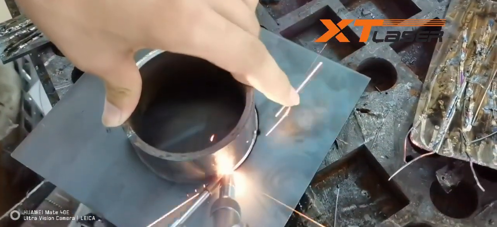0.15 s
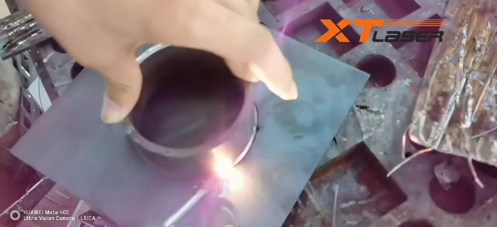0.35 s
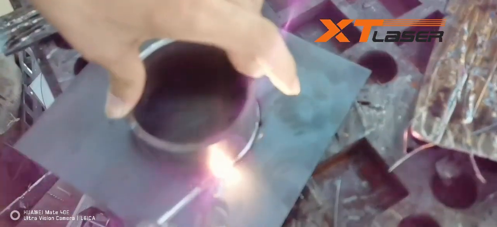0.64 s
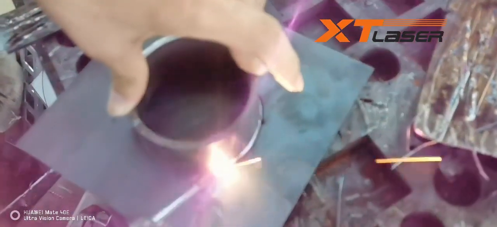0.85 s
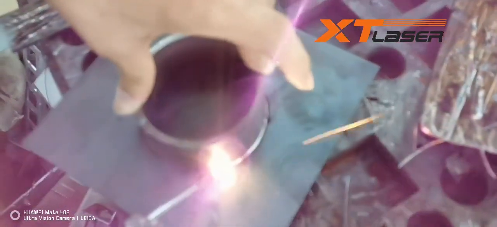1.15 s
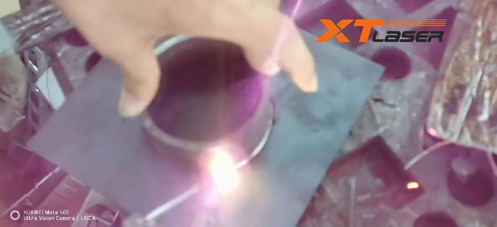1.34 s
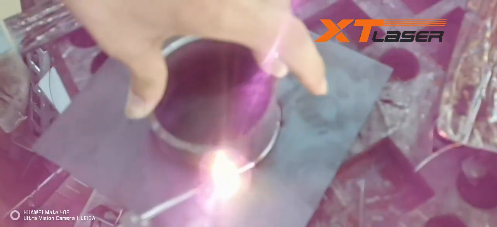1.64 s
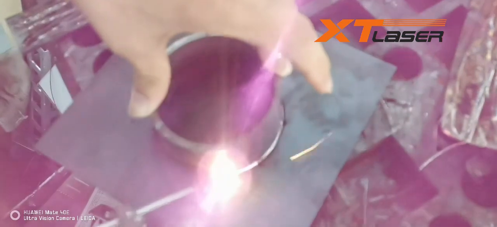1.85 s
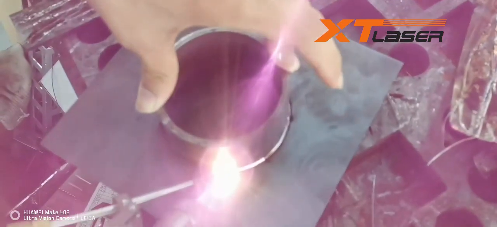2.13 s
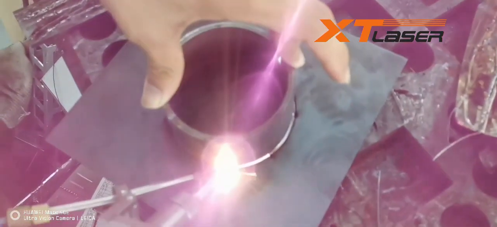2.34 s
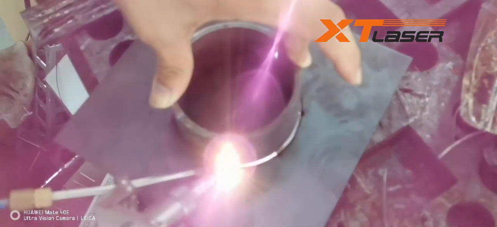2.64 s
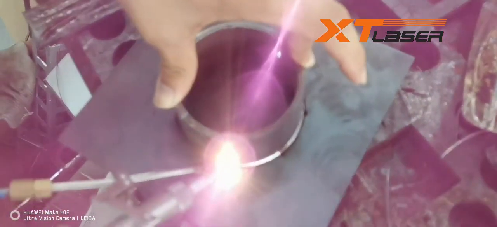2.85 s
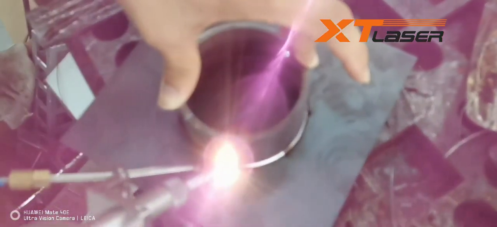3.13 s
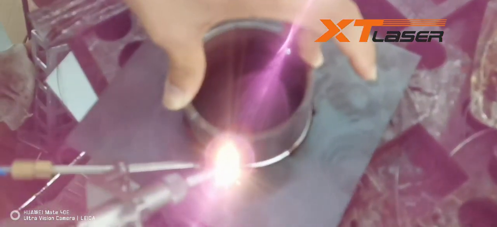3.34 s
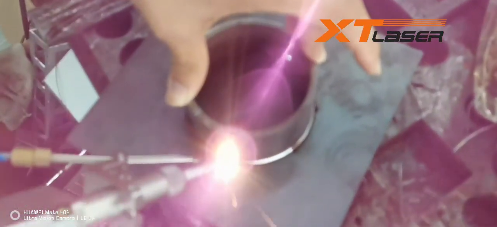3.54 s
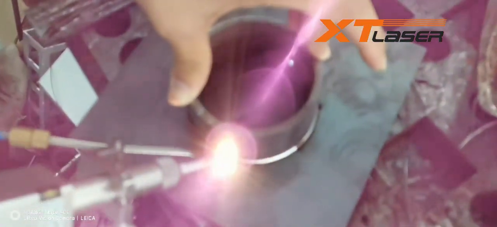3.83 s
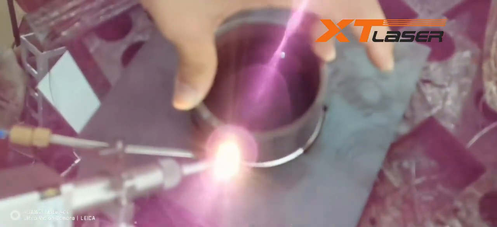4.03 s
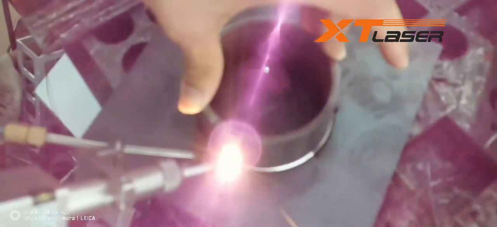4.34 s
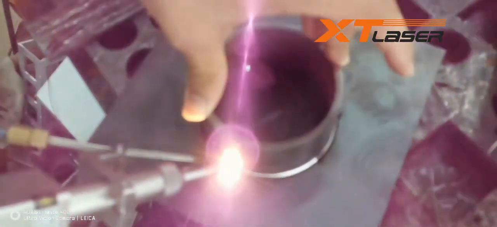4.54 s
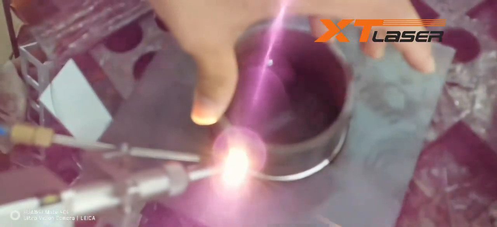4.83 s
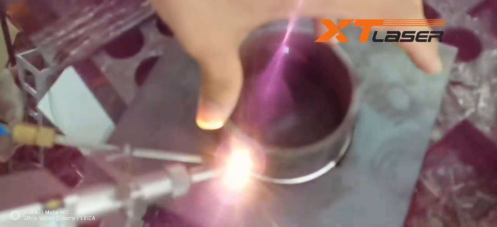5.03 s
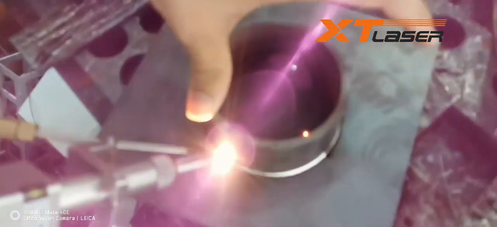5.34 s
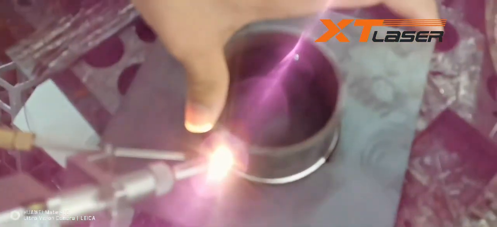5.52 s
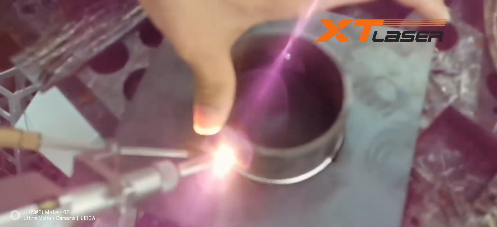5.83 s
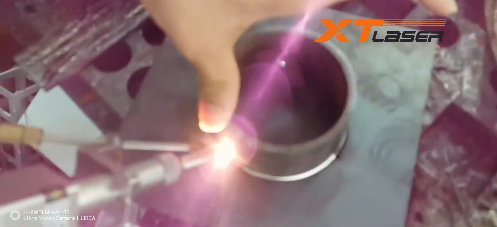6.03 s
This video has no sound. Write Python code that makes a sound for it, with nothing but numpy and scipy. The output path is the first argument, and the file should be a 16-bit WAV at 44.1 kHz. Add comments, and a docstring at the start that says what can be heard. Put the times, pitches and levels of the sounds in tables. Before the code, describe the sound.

A welding beam is already biting into steel at the start: a loud, bright, smooth hiss for about a quarter second, then a brief falter and a slightly quieter, rougher hiss with a rapid buzzing pulse. Tiny crackles and sharp droplet spits dot it. Its tone slides slowly as the torch moves. Faint hum and low fan air lie beneath. Close stereo microphone, almost no echo.

```python
"""Handheld laser welding on steel, close up

A bright flare on cold steel hands over to a settled vapour hiss, pulsed by the beam's side-to-side sweep.
Jet and spits are shaped noise; resonances of pipe stub and plate, and gliding echoes off the hand, colour them.
The sweeping head hums in wavering sines; the workshop's air is a low noise with passing rumbles.
"""
import sys
import numpy as np
from scipy import signal
from scipy.fft import rfft, irfft, next_fast_len
from scipy.io import wavfile
from scipy.ndimage import uniform_filter1d, map_coordinates

SR = 44100
rng = np.random.default_rng(int(sys.argv[2]) if len(sys.argv) > 2 else 0)


def to_wav(s):
    """Save 16-bit WAV."""
    ch = np.atleast_2d(s).T  # columns
    pcm = np.round(np.clip(ch, -1, 1) * 32767)  # PCM
    wavfile.write(sys.argv[1], SR, pcm.astype(np.int16))


N = 272402
TIME = np.arange(N) / SR
SWEEP_HZ = 79.96  # side-to-side rate of the beam
RING_OUT_S = 5.13  # the plate rings out around this moment


def amp(db):
    """Turn decibels into gain."""
    return 10 ** (np.asarray(db) / 20)


def unit(x):
    """Scale to rms 1."""
    return x / np.sqrt(np.mean(x ** 2) + 1e-20)


def along(points, hz):
    """Read each column of (Hz, ..) rows at hz, on a log frequency axis."""
    point_hz, *columns = np.transpose(points)
    return [np.interp(np.log(hz + 1), np.log(point_hz + 1), column) for column in columns]


def wobble(rate):
    """Draw a smooth random curve with this many knots a second."""
    knots = rng.standard_normal(int(N * rate / SR) + 4)
    return map_coordinates(knots, [TIME * rate])


def swell(peak_s, width_s, t=TIME):
    """Draw a bell that rises to 1 and falls again."""
    return np.exp(-((t - peak_s) / width_s) ** 2)


def seam(*levels_db):
    """Draw a smooth arc through the levels at the start, middle and end of the seam."""
    return np.polyval(np.polyfit([0, .5, 1], levels_db, 2), TIME / TIME[-1])


def filtered(x, response):
    """Multiply the spectrum of x by a response of frequency, which may be complex."""
    size = next_fast_len(N + SR // 4)
    hz = np.fft.rfftfreq(size, 1 / SR)
    return irfft(rfft(x, size) * response(hz), size)[..., :N]


def below(hz, edge_hz, order=24):
    """Gain of a low-pass; a higher order is steeper."""
    return 1 / (1 + (hz / edge_hz) ** order)


def workshop_air(level_db):
    """Low rush of fans: noise partly alike at the two ports, with a rumble that swells now and then."""
    # Spectrum of the air. Each row: frequency in Hz, relative level in dB.
    air_spectrum = [(12, -64), (20, -37), (88, -9.5), (130, -7), (157, -6), (243, -6.5), (270, -13),
                    (310, -8), (345, -11), (480, -9.5), (756, -12.5), (1300, -13), (1690, -80),
                    (2860, -120)]
    # Likeness of the air at the two ports. Each row: frequency in Hz, likeness from 0 to 1.
    air_alike = [(30, 0.3), (80, 0.7), (200, 0.8), (600, 0.85), (1200, 0.52)]
    # Rumbles. Each row: peak in seconds, half length in seconds, centre in Hz, width in Hz, level in dB.
    rumble_swells = [(0.88, .13, 95, 40, -58), (2.38, .12, 139, 90, -55), (2.9, 0.56, 165, 110, -54.5),
                     (3.0, 0.34, 240, 35, -57.5), (3.057, 0.052, 162, 40, -49), (3.75, 0.054, 155, 50, -50)]

    def colour(hz):
        # the angle splits the power between sum and difference, which sets the likeness
        angle = np.arccos(np.clip(along(air_alike, hz)[0], 0, 1)) / 2
        return amp(along(air_spectrum, hz)[0]) * np.array([np.cos(angle), np.sin(angle)])

    mid, side = filtered(rng.standard_normal((2, N)), colour)
    air = amp(level_db + 0.37 * wobble(7.7)) * unit(np.array([mid + side, mid - side]))
    for peak_s, length_s, centre_hz, width_hz, db in rumble_swells:
        noise = rng.standard_normal(N) + .55 * rng.standard_normal((2, N))
        rumble = filtered(noise, lambda hz: below(2 * (hz - centre_hz), width_hz, order=4))
        air += amp(db) * swell(peak_s, length_s) * unit(rumble)
    return air * amp([[.4], [-.4]])  # the left port is slightly louder


def hum(gain_db, waver_db, drift_cycles, whine_db, whine_s):
    """The sweeping head hums near multiples of its rate; the high lines whine as the plate rings out."""
    # Lines of the hum. Each row: multiple of the sweep rate, relative level in dB rms.
    lines = [(1, -72), (2, -57.5), (3, -67.5), (4, -66.5), (5, -71), (6, -66), (7, -70), (8, -74),
             (13, -73), (15, -80), (16, -83)]
    fade_starts_s, fade_db_per_s = 5.1, 4  # the hum eases towards the end of the seam
    fade_db = -fade_db_per_s * np.maximum(TIME - fade_starts_s, 0)
    whine = whine_db * swell(RING_OUT_S, whine_s)
    out = np.zeros(N)
    for multiple, db in lines:
        hz = round(multiple) * SWEEP_HZ
        level_db = db + waver_db * wobble(11) + (hz > 950) * whine + fade_db
        cycles = hz * TIME + rng.random() + drift_cycles * wobble(7)
        out += amp(level_db) * np.sin(2 * np.pi * cycles)
    return amp(gain_db) * np.sqrt(2) * out


def room(x, t60):
    """A faint, very short scatter off the bench and the metal around it: decaying noise as an echo tail."""
    t = np.arange(SR // 2) / SR
    tail = rng.standard_normal((2, len(t))) * amp(-60 * t / t60) * (t > .004)
    return signal.fftconvolve(x, tail / np.linalg.norm(tail[0]), axes=1)[:, :N]


def off_hand(x):
    """Hand and pipe return the short waves later as the torch moves on, so combs glide down the treble."""
    # Echoes. Each row: first delay in ms, eventual growth in ms, gain at the left port, gain at the right.
    echoes = [(.69, .39, .22, 0), (.74, .67, 0, -.22), (.84, .34, .22, .18), (2.0, .27, -.06, -.14)]
    settles_s = 2.3
    treble = filtered(x, lambda hz: 1 - below(hz, 6500, order=6))
    moved = 1 - np.exp(-TIME / settles_s)
    out = x.copy()
    for first_ms, growth_ms, *gains in echoes:
        read_at = (TIME - (first_ms + growth_ms * moved) / 1000) * SR
        out += np.array([gain * map_coordinates(port, [read_at], order=5)
                         for gain, port in zip(gains, treble)])
    return out


def shaded(x, blotch_db, dips_and_swells=()):
    """Colour the ports' sum and difference: slow random blotches, dips and swells whose centre slowly falls."""
    sag_per_s = 0.027  # share of its frequency by which a centre falls each second
    both = np.array([x[0] + x[1], x[0] - x[1]]) / 2
    hz, s, z = signal.stft(both, SR, nperseg=1024)
    field = rng.standard_normal(z.shape)
    for _ in range(2):
        field = uniform_filter1d(field, size=5, axis=1)  # across frequency
        field = uniform_filter1d(field, size=16, axis=2)  # across time
    gain_db = blotch_db * unit(field)
    for peak_s, length_s, centre_hz, width_hz, *changes_db in dips_and_swells:
        falling_hz = centre_hz * (1 - sag_per_s * (s - peak_s))
        offset = (hz[:, None] - falling_hz) / width_hz
        shape = swell(peak_s, length_s, s) * .5 ** (2 * offset) ** 2
        gain_db += np.multiply.outer(changes_db, shape)
    mid, side = signal.istft(z * amp(gain_db), SR, nperseg=1024)[1][..., :N]
    return np.array([mid + side, mid - side])


def vapour(pulse_db, burst_db, flutter_db, crackle):
    """Three noises (direct, scattered left, scattered right): boiling steel pulses together over steady gas."""
    sweep = 2 * np.pi * SWEEP_HZ * TIME
    # the beam crosses the joint twice a sweep, and one crossing starts with a sharp burst
    crossings = pulse_db * np.cos(2 * (sweep - 1.9))
    burst = burst_db * np.exp(7 * (np.cos(sweep - 1.4) - 1))
    # the vapour stalls as the beam turns back
    stall = 1.2 * np.exp(9 * (np.cos(sweep - 3.5) - 1))
    # the pulsing grows deeper and shallower with the melt
    pulses = (crossings + burst - stall) * (1.05 + .3 * wobble(12))
    # the melt pool flutters quickly
    surge = amp(pulses + flutter_db * wobble(700))
    # tiny pops, about 500 a second, stand out of the direct rush
    pops = unit((rng.random(N) < 500 / SR) * rng.standard_normal(N))
    rush = rng.standard_normal((3, N))
    rush[0] += crackle * pops
    boiling = unit(surge * rush)
    gas = rng.standard_normal((3, N))

    def gas_share(hz):
        # steady gas fills the lower hiss and part of the airy top; pulsing vapour owns the treble between
        return below(hz, 6600, order=4) + .25 * (1 - below(hz, 12000, order=12))

    pulsing = filtered(boiling, lambda hz: np.sqrt(1 - gas_share(hz)))
    steady = filtered(gas, lambda hz: np.sqrt(gas_share(hz)))
    return pulsing + steady


def spits(gain_db, t60):
    """Droplets burst from the melt, each a very short crack of decaying noise."""
    # The loudest spits of molten steel. Each row: start in seconds, relative peak level in dB.
    droplets = [(0.161, -17), (0.212, -18), (0.378, -16), (1.078, -17), (2.454, -16), (2.491, -18),
                (3.0665, -14.5), (3.3046, -18), (3.4547, -16), (3.554, -16), (4.8287, -19), (5.168, -16)]
    envelope = np.zeros(N)
    t = np.arange(SR // 40) / SR
    for start_s, db in droplets:
        start = round(start_s * SR)
        envelope[start:start + len(t)] += amp(db + gain_db - 60 * t / t60)
    return envelope * rng.standard_normal((3, N))


def at_ports(x, colour_db):
    """Colour the jet; its direct part reaches the left port first, its scattered part differs between ports."""
    # The two microphone ports. Each row: frequency in Hz, left minus right in dB, likeness from 0 to 1,
    # phase lead of the left in radians.
    ports = [(700, 0.7, 0.77, 0.2), (1100, 1.2, 0.66, 1.2), (1350, 0.3, 0.55, 0.8), (1620, 2, 0.7, 2.6),
             (1830, 0, 0.66, 0.8), (2300, 0.3, 0.62, 2), (2950, 0.4, 0.87, 6.2), (3700, -1, 0.75, 7.1),
             (3950, -0.7, 0.78, 8.7), (4500, -1.2, 0.8, 8.6), (5400, 0.4, 0.8, 10.1),
             (5750, 2.5, 0.65, 9.7), (6400, 0.3, 0.62, 10.3), (6850, 0, 0.88, 12.4), (7800, 0.5, 0.7, 14.1),
             (8500, 5, 0.35, 13.6), (9200, 10, 0.5, 15.6), (10300, 9, 0.64, 17.1), (11100, 3, 0.62, 17.9),
             (12200, 0.7, 0.78, 18.6), (12550, 1, 0.7, 18.9), (12900, 1, 0.5, 20.7), (13300, 0, 0.55, 19.4),
             (14200, -3, 0.68, 20.6), (15600, -1.5, 0.4, 22.3)]

    def port_gain(hz, direct):
        balance_db, alike, lead = along(ports, hz)
        alike = np.clip(alike, 0, 1)
        sides = amp([balance_db / 2, -balance_db / 2])
        sides = sides / np.linalg.norm(sides, axis=0)
        gain = amp(colour_db(hz)) * sides * (1 - below(hz, 720, order=4))
        if direct:
            return gain * np.sqrt(alike) * np.exp(.5j * np.array([lead, -lead]))
        return gain * np.sqrt(1 - alike)

    direct = filtered(x[0], lambda hz: port_gain(hz, True))
    scattered = filtered(x[1:], lambda hz: port_gain(hz, False))
    return direct + scattered


def flare():
    """The beam bites into cold steel with a louder, brighter, smoother hiss that holds and then sags."""
    # Spectrum of the flare. Each row: frequency in Hz, relative level in dB.
    flare_spectrum = [(500, -34), (1250, -27.5), (1550, -24), (1800, -11), (2050, -14), (2650, -9),
                      (3100, -5.5), (3700, -7.5), (4400, -5), (5000, -5.5), (5600, -2), (6050, -3),
                      (6500, -6), (7200, -2), (8200, -8), (8900, 0), (10500, 2.5), (10900, -1.5),
                      (11800, 0), (12400, -7), (12800, -4.5), (13400, -5), (14000, -3), (14700, -10),
                      (15600, -6)]
    start_db, hold_s, sag_db_per_s = -14, 0.18, 30
    level_db = start_db - sag_db_per_s * np.maximum(TIME - hold_s, 0)
    jet = vapour(pulse_db=1.1, burst_db=.8, flutter_db=.9, crackle=.07) + spits(gain_db=23, t60=.009)
    return amp(level_db) * unit(at_ports(jet, lambda hz: along(flare_spectrum, hz)[0]))


def plate_ring():
    """Level of the plate's ring in dB: it grows along the seam and rings out once."""
    return seam(-39, -33, -31) + 4 * swell(RING_OUT_S, width_s=0.54)


def weld():
    """The settled jet rings the steel; bands of its hiss change level as the torch moves round the pipe."""
    # Spectrum of the settled jet. Each row: frequency in Hz, relative level in dB.
    jet_spectrum = [(700, -30), (1400, -23.5), (1650, -24.5), (2600, -17.5), (3300, -7.5), (3800, -7),
                    (5400, -3.5), (6350, -9), (7600, -8.5), (8350, -11.5), (9100, -7), (12700, -8),
                    (13400, -10), (15600, -8.5)]
    # Resonances of the pipe stub and plate. Each row: centre in Hz, width in Hz, boost in dB.
    steel = [(1047, 41, 11.5), (1227, 170, 7), (1834, 234, 15), (3059, 190, 7.5), (4330, 73, 8),
             (5707, 560, 6), (6730, 150, 4), (7670, 500, 4), (9260, 400, 2), (10320, 1100, 4),
             (11940, 700, 3), (12740, 260, 1.5), (13800, 400, 5.5)]
    # The highest hiss beams sideways as the torch turns. Each row: time in seconds, left minus right in dB.
    top_pan = [(0.4, 2.5), (2.08, -1), (3.48, 2), (5.96, 4.5), (6.1, 2)]

    # the jet is nearly steady, but falters once just after the flare
    level_db = -24 + 0.36 * wobble(5.06) - 3 * swell(0.456, width_s=0.041)
    jet = vapour(pulse_db=1.7, burst_db=3.7, flutter_db=1.3, crackle=.2) + spits(gain_db=22.0, t60=0.009)

    def colour_db(hz):
        rings = sum(db / (1 + (2 * (hz - centre_hz) / width_hz) ** 2) for centre_hz, width_hz, db in steel)
        return along(jet_spectrum, hz)[0] + rings

    hiss = at_ports(jet, colour_db)

    def part(low_hz, high_hz):
        return filtered(hiss, lambda hz: below(hz, high_hz) - below(hz, low_hz))

    def flicker(depth_db):
        # slow and quick wavering of one part on its own
        return depth_db * (wobble(9) + wobble(70))

    # each seam() arc is a part's level in dB at the start, halfway and at the end
    plate = amp(plate_ring()) * unit(part(470, 1540))
    pipe = amp(seam(-19, -18, -19.5) + flicker(depth_db=1.03)) * unit(part(1503, 2040))
    # the valley just above the pipe's note is deepest near halfway along the seam
    valley = amp(seam(-14, -20.5, -16.5)) * unit(part(2060, 2820))
    body = amp(seam(-7, -4.5, -5) + flicker(depth_db=0.5)) * unit(part(2724, 5085) + part(5986, 8160))
    sizzle = amp(seam(-10.5, -12, -5) + flicker(depth_db=2.1)) * unit(part(5040, 5870))
    top_pan_db = np.interp(TIME, *np.transpose(top_pan))
    sides = unit(amp(np.array([top_pan_db, -top_pan_db]) / 2))
    top = amp(seam(-1, -0.16, -2.5)) * sides * np.array([unit(port) for port in part(8270, SR / 2)])
    return amp(level_db) * (plate + pipe + valley + body + sizzle + top)


def scene():
    """The flare hands over to the settled weld, whose melt pool heaves irregularly at roughly 4 to 12 Hz."""
    # Dips and swells of the hiss, in the ports' sum and difference. Each row: strongest at in seconds,
    # half length in seconds, centre in Hz, width in Hz, change of the sum in dB, of the difference in dB.
    dips_and_swells = [(0.1, 0.23, 4030, 220, -22, -8), (0.59, 0.29, 3990, 280.8, -36, -9),
                       (0.8, 0.75, 5260, 555.6, -2, -13), (2.4, 0.4, 5870, 281, -30, -8),
                       (2.1, 0.82, 5200, 240, -6, -19), (3.07, 1.27, 2742, 176, -25, -11),
                       (3.5, 0.45, 13450, 400, -8, -11), (3.9, 0.95, 8160, 540, -8.5, -3),
                       (4, 0.21, 4870, 430, -8, -7), (4.93, 0.86, 11500, 468, -7, -3),
                       (5.72, 0.44, 4030, 360, -26, -3), (6, 0.57, 8380, 500, -15, -4),
                       (6.32, 0.35, 6150, 720, 13, 6), (1.96, 1, 7660, 970, 2.5, 1.5),
                       (0.5, 1.1, 3300, 250, -1, -8), (0.5, 1.1, 2660, 302, 0.5, -12),
                       (0.8, 1.1, 4770, 378, 4, 4), (1.05, 0.53, 4410, 300, 5, 1),
                       (0.3, 1.2, 1560, 250, -4, 5), (0.9, 0.74, 1880, 180, -6.5, -6),
                       (4.1, 1, 3350, 486, -1.5, 5), (5.7, 0.9, 9400, 400, 0, -11),
                       (5.5, 0.38, 13100, 400, -5, 4), (4.1, 0.6, 12100, 300, 6, 1),
                       (6.1, 0.3, 4500, 378, 0, -4), (0.9, 0.52, 11200, 260, -9, -5),
                       (1.5, 0.4, 9900, 260, -1, -7), (2.35, 0.39, 9900, 220, -7, -3),
                       (2.6, 0.55, 11400, 450, 2.5, 0), (3.2, 0.7, 1830, 300, 0.5, -2),
                       (3.9, 0.6, 3300, 900, 1.8, 0), (4.15, 0.4, 5600, 600, 2.5, 0),
                       (0.1, 0.2, 4450, 400, 3, 0), (4.9, 0.55, 1009, 120.4, 2, 5),
                       (5, 0.18, 1200, 183.6, 9, 6)]
    settle_s, handover_s = 0.277, 0.046
    settled = np.clip((TIME - settle_s) / handover_s, 0, 1)
    heave = unit(filtered(rng.standard_normal(N), lambda hz: below(hz, 12, order=4) - below(hz, 4, order=6)))
    torch = np.sqrt(1 - settled) * flare() + np.sqrt(settled) * amp(.45 * heave) * weld()
    torch = shaded(off_hand(torch), blotch_db=1.0, dips_and_swells=dips_and_swells)
    air = shaded(workshop_air(level_db=-51.0), blotch_db=1.2)
    machine = hum(gain_db=-1.5, waver_db=2, drift_cycles=0.11, whine_db=16, whine_s=0.6)
    return torch + amp(-9) * room(torch, t60=0.021) + machine + air


def record(dry):
    """Softly limit the highest peaks and cut everything above the top frequency."""
    top_hz = 15750
    limited = dry / (1 + np.abs(dry / .85) ** 6) ** (1 / 6)
    return filtered(limited, lambda hz: hz < top_hz)


dry = scene()
out = record(dry)
to_wav(out)
```